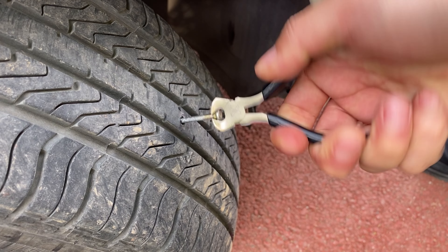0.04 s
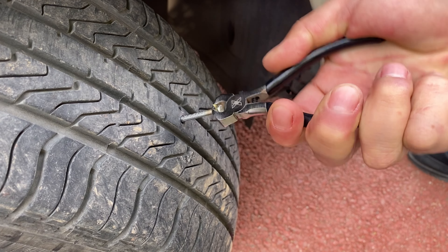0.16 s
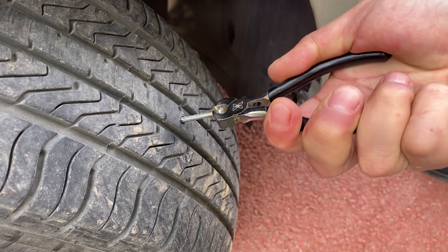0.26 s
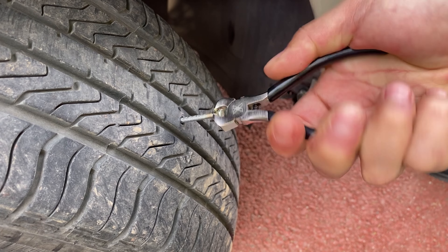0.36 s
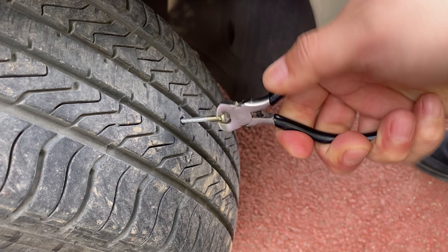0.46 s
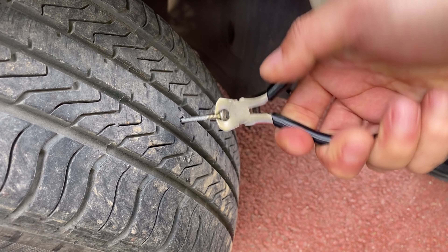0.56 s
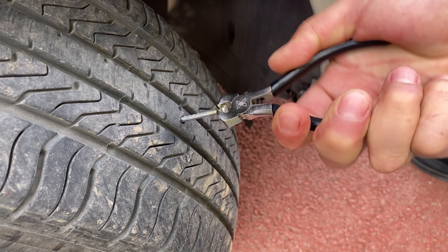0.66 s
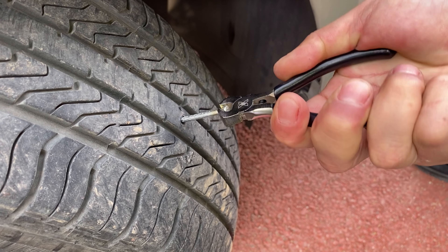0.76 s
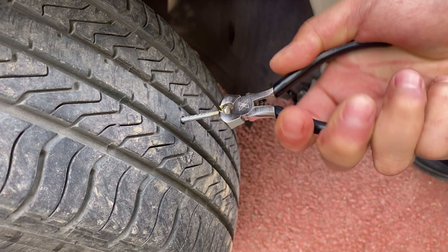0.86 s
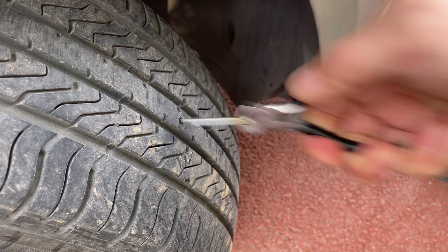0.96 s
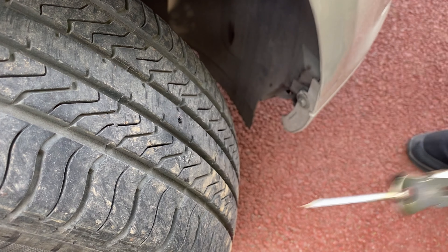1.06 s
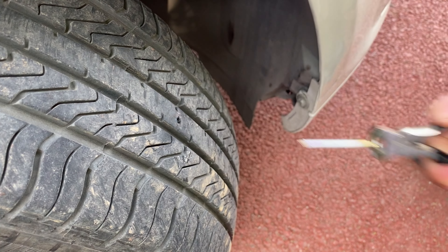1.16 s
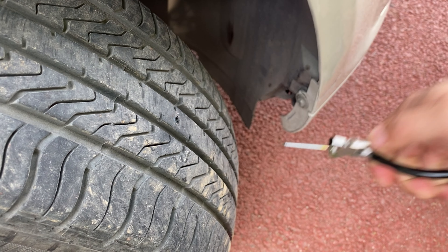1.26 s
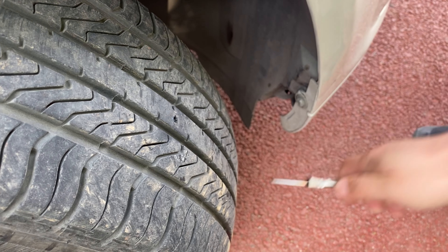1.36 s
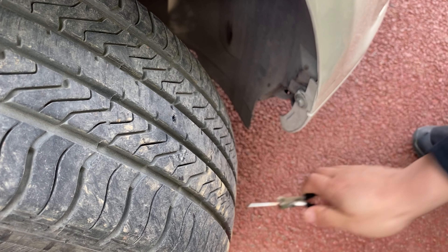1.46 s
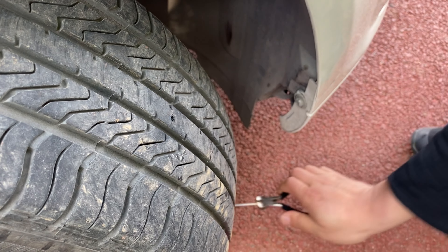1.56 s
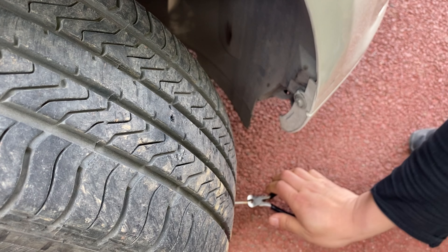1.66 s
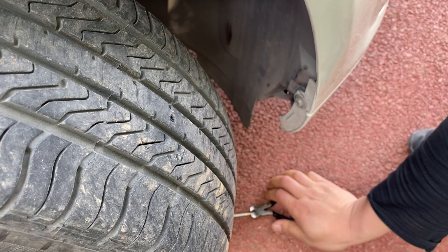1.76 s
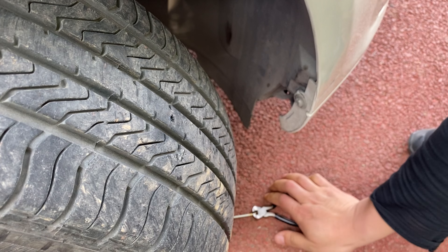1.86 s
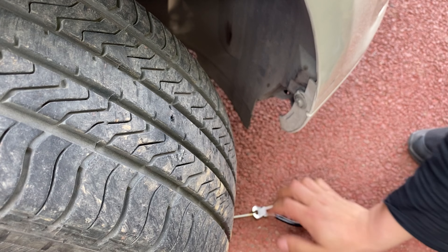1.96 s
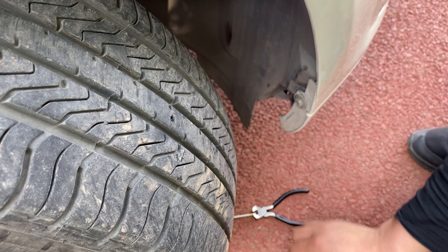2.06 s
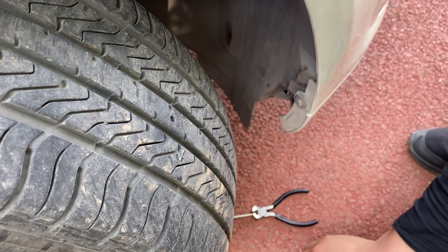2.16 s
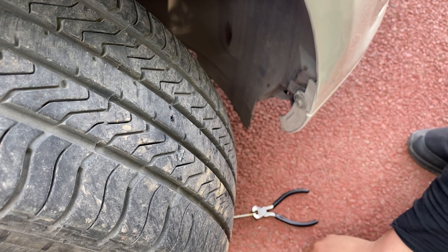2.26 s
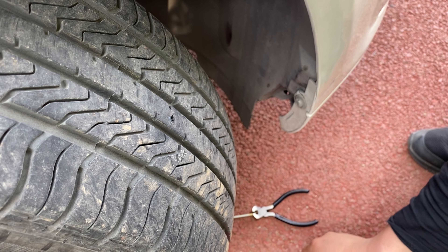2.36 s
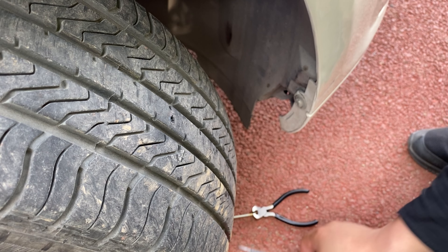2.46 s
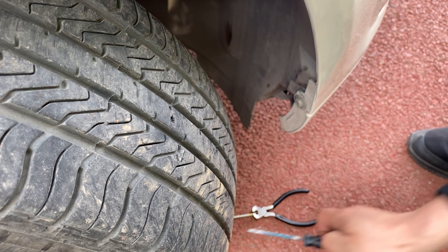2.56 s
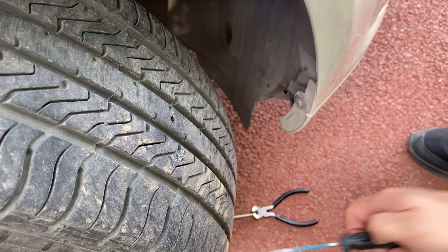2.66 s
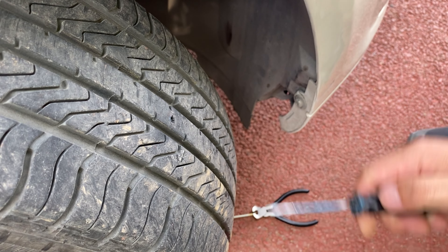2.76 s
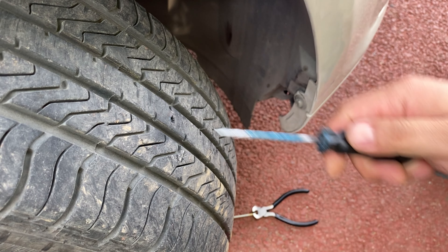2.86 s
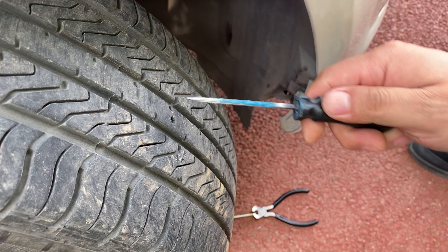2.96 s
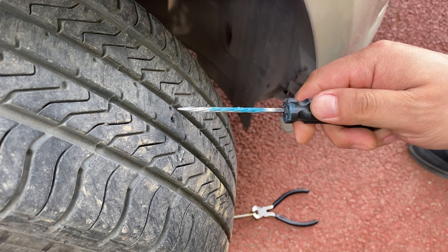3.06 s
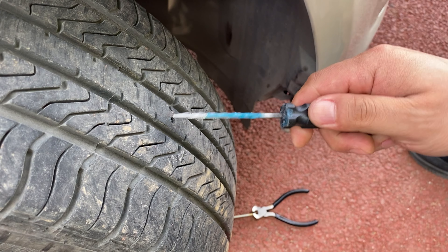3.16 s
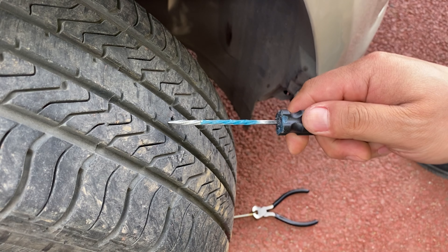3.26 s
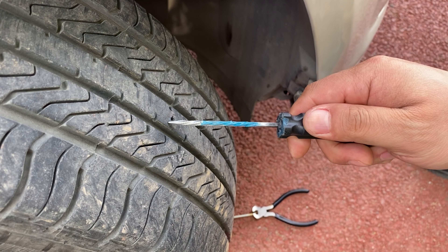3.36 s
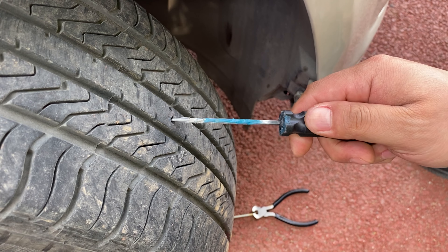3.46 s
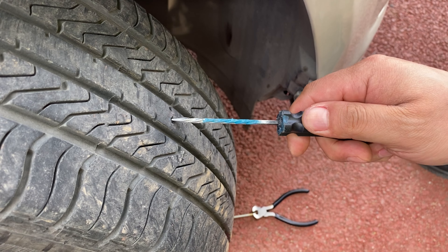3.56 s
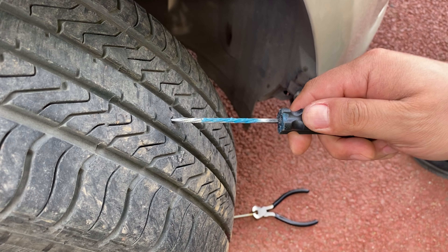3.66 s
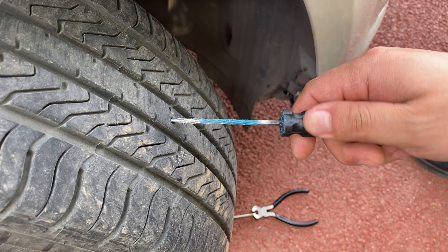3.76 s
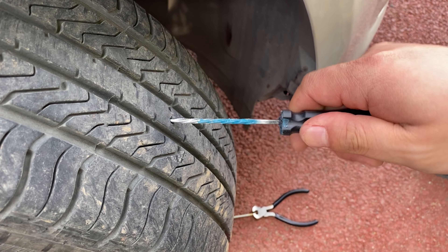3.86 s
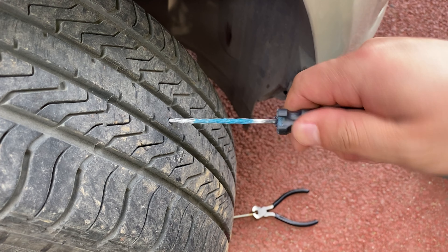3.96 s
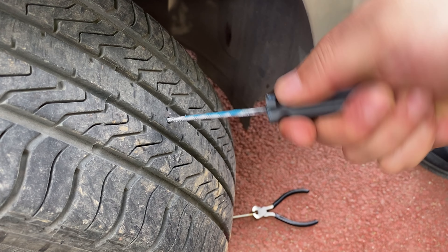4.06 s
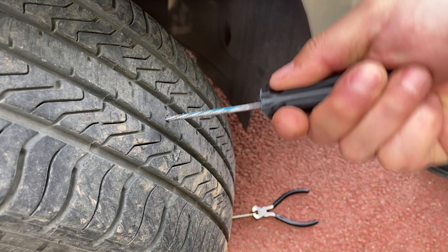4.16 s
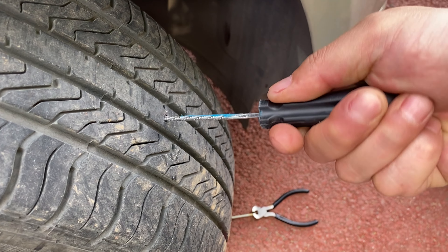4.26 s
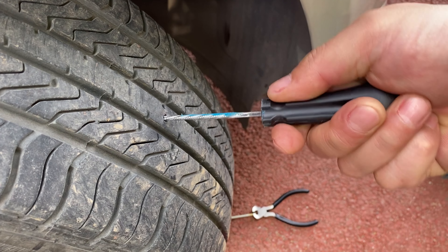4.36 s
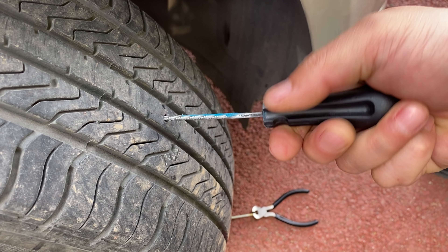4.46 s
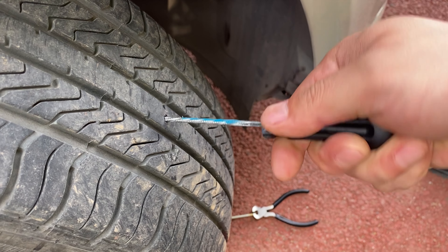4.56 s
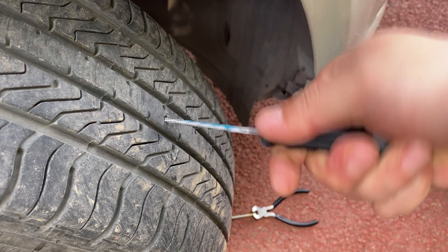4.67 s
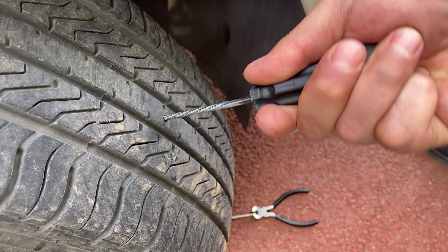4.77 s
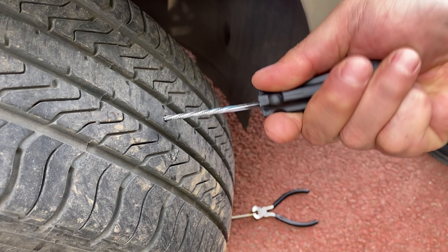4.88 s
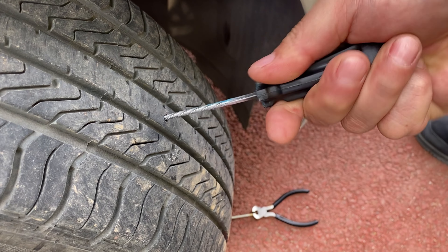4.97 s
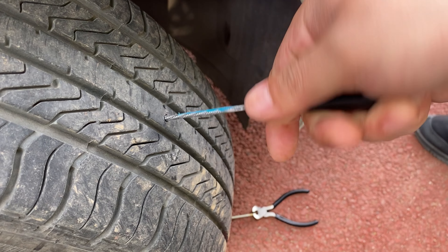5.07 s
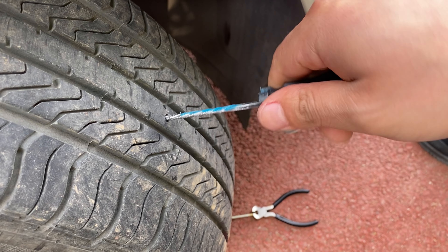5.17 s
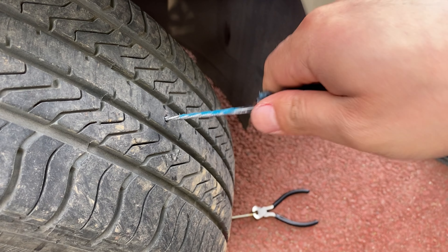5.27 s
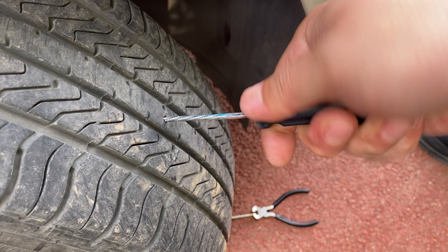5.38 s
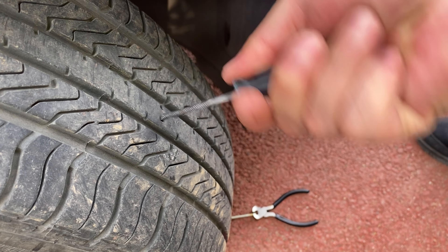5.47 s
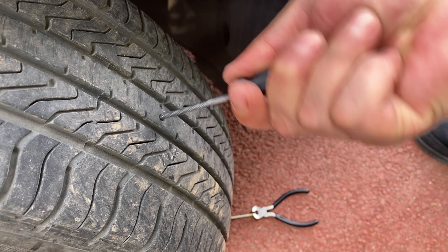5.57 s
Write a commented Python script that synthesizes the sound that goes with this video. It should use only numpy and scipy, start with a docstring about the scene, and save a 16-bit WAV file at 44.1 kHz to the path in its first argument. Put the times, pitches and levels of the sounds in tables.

```python
"""Nail pulled from a tyre

A nail is worked out of a car tyre with pliers: seeping noise, rasps of stick-slip, cracks and ringing steel.
It leaves with a broadband pop and a wall thud, then air jets from the hole as hiss and rush noise.
A reamer crosses the jet, turns a puff of it onto the microphone and plugs the hole; it rubs and rasps
as it is twisted, and a thin leak seeps round the shaft. Low noise gives the light wind and four dull swells,
wavering sines a far machine and a brief whine."""
import sys
import numpy as np
from scipy import signal
from scipy.fft import rfft, irfft, next_fast_len
from scipy.io import wavfile
from scipy.ndimage import uniform_filter1d

SR = 44100
rng = np.random.default_rng(int(sys.argv[2]) if len(sys.argv) > 2 else 0)


def store_wav(level_fs):
    """Save 16-bit WAV to argv[1]."""
    pcm = np.round(np.clip(np.atleast_2d(level_fs), -1, 1) * 32767)
    wavfile.write(sys.argv[1], SR, pcm.T.astype(np.int16))


N = 247842
TIME = np.arange(N) / SR
SIZE = next_fast_len(N + 8192)
FREQS = np.maximum(np.arange(SIZE // 2 + 1) * SR / SIZE, 1)
CUTOFF_HZ = 15750
POP_RISE_DB_PER_S = 5000  # onset of pop and jet

# Colour tables throughout: freq_hz, relative density_db_per_hz
# Hollows of tread and wheel arch, rung by pop and rush: freq_hz, width_hz, full lift_db
HOLLOWS = [(580, 100, 0.5), (1087, 48, 5), (1386, 89, 7), (1960, 90, 7), (2320, 110, 4), (2830, 120, 7),
           (3570, 130, 6), (4360, 110, 5), (4800, 70, 4), (5020, 60, 4), (6050, 90, 8), (6470, 80, 8),
           (7030, 120, 8)]
# Low noise of the puffs and the dull swells
LOW_COLOUR = [(25, -1.5), (60, 3), (150, 9), (300, -1.5), (450, -16), (650, -28), (1500, -52)]


def from_db(db):
    """Decibels to gain."""
    return 10 ** (np.asarray(db) / 20)


def rms_one(x):
    """Scale to unit power."""
    return x / np.sqrt(np.mean(x ** 2) + 1e-20)


def level(rows):
    """Gain over time from a dB curve, near-silent outside it."""
    time_s, level_db = np.transpose(rows)
    return from_db(np.interp(TIME, time_s, level_db, left=-140, right=-140))


def over_hz(points):
    """A table read at every frequency, on a log axis."""
    freq_hz, value = np.transpose(points)
    return np.interp(np.log(FREQS), np.log(freq_hz), value)


def drift(rate_hz):
    """Smooth random wander of rms 1, its spectrum halved in amplitude at rate_hz."""
    smoothed = rfft(rng.standard_normal(SIZE)) / (1 + (FREQS / rate_hz) ** 2)
    return rms_one(irfft(smoothed, SIZE)[:N])


def turbulence(colour, resonances=()):
    """Coloured noise of rms 1, lifted at any resonances, partly shared by the two microphones."""
    # Likeness of the microphones: freq_hz, correlation 0-1
    likeness = [(60, 0.92), (150, 0.81), (300, 0.42), (750, 0.13), (1400, 0.27), (2200, 0.72), (3000, 0.72),
                (4000, 0.43), (6300, 0.86), (8000, 0.72), (8700, 1), (9500, 1), (10200, 0.57), (14200, 1),
                (15200, 0.89)]
    mid, side = rfft(rng.standard_normal((2, SIZE)))
    alike = np.clip(over_hz(likeness), 0, 1)
    pair = np.sqrt(1 + alike) * mid + np.sqrt(1 - alike) * side * [[1], [-1]]
    db = over_hz(colour)
    for hz, width_hz, lift_db in resonances:
        db = db + lift_db / (1 + (2 * (FREQS - hz) / width_hz) ** 2)
    return rms_one(irfft(pair * from_db(db) * (FREQS < CUTOFF_HZ), SIZE)[:, :N])


def bell(centre_s, sigma_s):
    """A Gaussian swell centred on a moment."""
    return np.exp(-np.minimum(((TIME - centre_s) / sigma_s) ** 2 / 2, 50))


def burst(start_s, hold_s, rise_db_per_s, fall_db_per_s):
    """Gain that rises to full at start_s, holds, then dies away."""
    before_s = np.maximum(start_s - TIME, 0)
    after_s = np.maximum(TIME - start_s - hold_s, 0)
    below_db = rise_db_per_s * before_s + fall_db_per_s * after_s
    return from_db(-np.minimum(below_db, 200))


def lean(left_db):
    """Gains of the two microphones for a sound off to one side."""
    return from_db(left_db * np.array([[1], [-1]]) / 2)


def wind(gust_db):
    """Low rumble of moving air, its strength following the breeze, its lull and its gusts."""
    wind_colour = [(18, -51.5), (30, -25.5), (45, -3), (60, 3.5), (80, -2), (110, -4), (150, -14),
                   (220, -23.5), (350, -32.5), (800, -52), (2000, -71.5)]
    # Gusts that stand out of the breeze: centre_s, level_db before gust_db, sigma_s
    gust_rows = [(.25, -45.5, 0.11), (0.717, -35, 0.023), (0.845, -47, 0.024), (1.04, -34, 0.017),
                 (1.32, -49, 0.03), (1.807, -38, 0.029), (2.306, -43.5, 0.038), (2.48, -40.5, 0.03),
                 (3.364, -51.5, 0.065), (3.663, -50, 0.032), (4.0, -34, 0.038), (4.089, -40, 0.015)]
    # The breeze dies down for a moment: start_s, end_s, depth_db, fade_s
    lull = (4.27, 4.9, 17.3, 0.17)
    breeze_start_db, ease_db_per_s = -42, 1.5

    rumble = turbulence(wind_colour)
    power = np.mean(rumble ** 2, axis=0)
    rumble = rumble / np.sqrt(uniform_filter1d(power, size=4400))  # even out over 0.1 s
    start_s, end_s, depth_db, fade_s = lull
    calm = np.clip(np.minimum(TIME - start_s, end_s - TIME) / fade_s, 0, 1)
    breeze = from_db(breeze_start_db - ease_db_per_s * TIME - depth_db * calm)
    gusts = sum(from_db(db) * bell(centre_s, sigma_s) for centre_s, db, sigma_s in gust_rows)
    return (breeze + from_db(gust_db) * gusts) * rumble


def far_tone(hz, waver, broken_db):
    """A distant tone that wavers in pitch and fades in and out on the breeze."""
    cycles = hz * np.cumsum(1 + waver * drift(20)) / SR
    return from_db(broken_db * drift(12)) * np.sin(2 * np.pi * cycles)


def outdoors(drone_waver, drone_broken_db, whine_waver, whine_broken_db):
    """A soft noise wash of open air, with a far drone and a brief, broken whine of sine partials."""
    # Open air: time_s, level_db
    wash_level = [(0, -52.5), (0.9, -50.5), (3.6, -57), (4.3, -59), (5.62, -55.5)]
    outdoor_colour = [(25, -12), (50, 6), (150, 2.5), (300, -2.5), (500, -9), (950, -12), (1300, -16),
                      (2000, -26), (3000, -29), (5000, -37.5), (15000, -44)]
    # Far machine: pitch_hz, level_db before fading, left_minus_right_db
    drone_rows = [(286.5, -72, 0), (485, -80, -2), (592, -82, -2), (732, -77, 8), (1020, -84, 4),
                  (1084, -85, 2)]
    # Faint whine once the hole is plugged: pitch_hz, level_db before fading
    whine_rows = [(1122, -80), (1688, -77), (2245, -88)]

    drone = sum(from_db(db) * lean(left_db) * far_tone(hz, drone_waver, drone_broken_db)
                for hz, db, left_db in drone_rows)
    whine = sum(from_db(db) * far_tone(hz, whine_waver, whine_broken_db) for hz, db in whine_rows)
    return level(wash_level) * turbulence(outdoor_colour) + drone + bell(4.3, 0.18) * whine


def seep(nail_db, reamer_db, fizz_db, spit_db):
    """A thin leak between steel and rubber; it fizzes finely and spits as the gap shifts."""
    # Past the nail: time_s, level_db before nail_db
    past_nail = [(0.0, -84), (0.1, -80), (0.24, -92), (0.34, -94), (0.39, -78), (0.57, -73.5), (0.92, -82)]
    # Round the reamer shaft: time_s, level_db before reamer_db
    past_shaft = [(4.55, -95), (4.64, -71.5), (4.786, -58.5), (4.98, -60.5), (5.02, -66.5), (5.2, -67),
                  (5.35, -69.5), (5.478, -72.5), (5.496, -66.5), (5.57, -76.5), (5.585, -73), (5.62, -84)]
    # Spurts at the first twists of the reamer: start_s, hold_s, level_db before reamer_db
    spurt_rows = [(4.391, 0.037, -66), (4.468, 0.027, -74), (4.569, 0.021, -66.5)]
    seep_colour = [(600, -11), (1500, -9.5), (2500, -5), (4000, -4), (5500, -5.5), (7000, 0), (10000, -2),
                   (13000, -1.5), (15500, -1)]

    spurts = sum(from_db(db) * burst(start_s, hold_s, rise_db_per_s=750, fall_db_per_s=700)
                 for start_s, hold_s, db in spurt_rows)
    gap = from_db(nail_db) * level(past_nail) + from_db(reamer_db) * (level(past_shaft) + spurts)
    ragged = from_db(fizz_db * drift(600) + spit_db * drift(80))
    return gap * turbulence(seep_colour) * ragged


def rasps(slips_per_s, slip_s, scratch_db, wobble):
    """Dense slips of rubber on steel merge into a rustle, with a breathy squeak at that grip's pitch."""
    # Stick-slip: centre_s, level_db, sigma_s, squeak_hz, squeak_db against level_db
    rasp_rows = [(0.065, -76, 0.044, 3850, 0), (0.287, -80, 0.05, 3500, 0), (0.592, -73, 0.023, 3000, -6),
                 (0.809, -69, 0.04, 3700, -6), (4.438, -70, 0.0085, 3650, 0), (4.45, -72, 0.01, 2500, 1),
                 (4.48, -72, 0.01, 2630, 0), (4.483, -75, 0.01, 3950, 0), (4.583, -75, 0.008, 2800, 1),
                 (4.606, -64, 0.0043, 4650, -2), (5.03, -71, .012, 3400, -3),
                 (5.124, -64, 0.035, 2600, -10), (5.198, -69, 0.02, 3650, 0),
                 (5.385, -68.5, 0.035, 4500, -8), (5.411, -69, 0.011, 3450, -1),
                 (5.503, -67.5, 0.023, 2600, -3)]
    rasp_colour = [(1500, -14), (2200, -1), (2650, -2), (3100, -3), (3600, 0.5), (4600, -6.5), (8000, -20)]

    slips = (rng.random(N) < slips_per_s / SR) * rng.uniform(.3, 1, N)
    slip_decay = np.exp(-1 / (slip_s * SR))
    grain = rms_one(signal.lfilter([1], [1, -slip_decay], slips + 1e-18))
    scratch = from_db(scratch_db) * turbulence(rasp_colour)
    turning = 2 * np.pi * np.cumsum(1 + wobble * drift(396)) / SR  # phase per Hz of pitch
    out = 0
    for centre_s, db, sigma_s, hz, squeak_db in rasp_rows:
        squeak = from_db(squeak_db) * np.sin(hz * turning)
        out = out + from_db(db) * bell(centre_s, sigma_s) * (scratch + squeak)
    return grain * out


def ticks(crack_db, crack_s, tail_db, tail_s, ring_db, knock_db, knock_s):
    """Each slip is a sharp crack with a short scatter, a dull rubber knock and a damped ring of steel."""
    # Steel slipping in rubber and jaws: start_s, peak_db before trims, knock_and_ring_db against peak_db
    tick_rows = [(0.446, -46, -14), (0.692, -49, -16), (0.789, -33.5, -22), (0.8633, -47.5, -12),
                 (0.9302, -28, 7), (0.9438, -19.5, 6), (0.967, -40, -4), (0.9785, -44, -4),
                 (0.983, -41, 16), (0.9866, -34, 5), (0.9983, -14, -9), (1.0035, -34, 16.5),
                 (4.4464, -53, -8), (4.4594, -48, -14), (4.606, -54, -6), (4.6817, -49, 4),
                 (4.842, -45, -10), (5.03, -45, -18), (5.128, -46, -9), (5.4356, -44, -14.5),
                 (5.499, -42, -15), (5.511, -47, -7)]
    # Modes of pliers and nail: freq_hz, relative level_db, t60_s
    steel_modes = [(1120, -9, .022), (1370, -5.5, 0.033), (1710, -2, .018), (2680, -9.5, 0.011),
                   (3600, -2, 0.0099), (5900, -12.5, .012), (7450, -8.5, .012)]

    # crack_s, tail_s and knock_s are times to fall 20 dB
    envelope, knock, blows = np.zeros((3, N))
    for start_s, peak_db, low_db in tick_rows:
        started = TIME > start_s
        age_s = np.maximum(TIME - start_s, 0)
        snap = from_db(-20 * np.minimum(age_s / crack_s, 20))
        scatter = from_db(tail_db - 20 * np.minimum(age_s / tail_s, 20))
        envelope += from_db(peak_db) * started * (snap + scatter)
        knock += from_db(peak_db + low_db - 20 * np.minimum(age_s / knock_s, 20)) * started
        blows[int(start_s * SR)] = from_db(peak_db + low_db)
    ring = np.zeros((2, N))
    for hz, mode_db, t60_s in steel_modes:
        r, w = from_db(-60 / (t60_s * SR)), 2 * np.pi * hz / SR  # pole radius and angle
        mode = signal.lfilter([0, np.sin(w)], [1, -2 * r * np.cos(w), r * r], blows + 1e-18)
        ring += from_db(mode_db) * mode
    crack = turbulence([(400, -18), (1500, -4), (4000, -5.0), (8000, -3.5), (15000, -2.0)])
    rubber = turbulence([(300, -14), (1300, 1), (3500, -3), (8000, -14.5), (15000, -22)])
    return from_db(crack_db) * envelope * crack + from_db(knock_db) * knock * rubber + from_db(ring_db) * ring


def dull_swells(swell_db):
    """A dull low rumble swells and fades four times, a little higher than the wind."""
    # Swells: centre_s, level_db before swell_db, sigma_s
    swell_rows = [(0.68, -52.5, 0.13), (1.75, -58, 0.12), (5.055, -59, 0.1), (5.48, -55, 0.1)]
    strength = sum(from_db(db + swell_db) * bell(centre_s, sigma_s) for centre_s, db, sigma_s in swell_rows)
    return strength * turbulence(LOW_COLOUR)


def pop(pop_db, body_db, body_lag_s, body_rise_db_per_s, body_fall_db_per_s, body_left_db):
    """Air tears past the nail tip in a dense, ragged blast; a hollow body of noise swells just after."""
    pop_colour = [(300, -22), (780, -19), (1200, -14), (2000, -10), (3000, -11), (5500, -5), (8000, 1.5),
                  (12000, 2), (15500, 1)]
    body_colour = [(100, 4.5), (250, 0.5), (500, -2), (780, -5), (1200, -2.5), (2000, -6.5), (3000, -9.5),
                   (6000, -14.5), (12000, -25)]
    pop_s = 1.0178
    ragged = from_db(.5 * drift(400))
    blast = from_db(pop_db) * burst(pop_s, 0.009, POP_RISE_DB_PER_S, fall_db_per_s=750)
    swell = burst(pop_s + body_lag_s, 0, body_rise_db_per_s, body_fall_db_per_s)
    body = from_db(body_db) * lean(body_left_db) * swell
    return (blast * turbulence(pop_colour, HOLLOWS) + body * turbulence(body_colour, HOLLOWS)) * ragged


def thud(db, hz, sigma_s, left_db):
    """The tyre wall springs back as the nail lets go: a short low sine."""
    return from_db(db) * lean(left_db) * bell(1.03, sigma_s) * np.sin(2 * np.pi * hz * TIME)


def flow():
    """Strength of the jet: it sags with tyre pressure, steps and is cut off by the reamer."""
    # Pliers leave the stream, reamer meets the hole, eases back, enters: start_s, length_s, loss_db
    jet_drops = [(1.5, 0.057, 3.5), (3.615, 0.13, 17), (3.79, 0.065, -2), (3.904, 0.099, 19)]
    jet_start_s, plugged_s = 1.04, 4.02
    start_db, sag_db_per_s = -24.5, 1.51
    db = start_db - sag_db_per_s * (TIME - jet_start_s)
    for start_s, length_s, loss_db in jet_drops:
        db = db - loss_db * np.clip((TIME - start_s) / length_s, 0, 1)
    hole_open = burst(jet_start_s, plugged_s - jet_start_s, POP_RISE_DB_PER_S, fall_db_per_s=549)
    return from_db(db) * hole_open


def jet(hiss_db, rush_db, edge_db, flutter_db, sputter_db):
    """Fine eddies hiss at the hole, larger ones rush downstream; the stream half whistles on the reamer."""
    hiss_colour = [(3000, -33), (5500, -25.5), (6600, -15), (7300, -5.5), (9000, -5), (11000, -1.5),
                   (13000, 1.5), (14600, 3), (15600, 0)]
    rush_colour = [(200, -14.5), (450, -14), (900, -13.5), (1500, -10.5), (2200, -8.5), (3000, -4.5),
                   (3900, -5), (5000, -0.5), (6200, 1), (8000, 3.5), (12000, -10.5)]
    edge_colour = [(250, -14.5), (1000, -23), (2500, -16.5), (4200, -12.5), (6000, -8.5), (7800, -2.5),
                   (10000, -5.5), (13000, 0.5), (15600, 1.5)]
    # Breathy edge tones on the reamer: freq_hz, width_hz, lift_db
    edge_tones = [(2930, 360, 4.5), (5250, 160, 5.5), (6070, 213, 10), (7260, 210, 8), (8000, 400, 3.5),
                  (14100, 250, 3)]
    # Reamer crosses the stream: centre_s, sigma_s
    crossing = (3.212, 0.025)

    rush_hollows = [(hz, width_hz, 0.48 * lift_db) for hz, width_hz, lift_db in HOLLOWS]  # rings fainter
    hiss = from_db(hiss_db) * turbulence(hiss_colour)
    rush = from_db(rush_db) * turbulence(rush_colour, rush_hollows)
    edge = from_db(edge_db) * bell(*crossing) * turbulence(edge_colour, edge_tones)
    unsteady = from_db(flutter_db * drift(25) + sputter_db * drift(500))
    return flow() * (hiss + rush + edge) * unsteady


def puffs(puff_db, eddy_db):
    """Eddies on the microphone swing its pressure, quickening then slowing, and shed smaller eddies."""
    # Puffs of air: centre_s, peak_db before trims, pitch_hz at centre
    puff_rows = [(1.789, -32, 111), (3.912, -37, 190), (3.935, -25.5, 56), (3.968, -27.5, 230),
                 (3.978, -31, 333), (3.982, -17.5, 170), (4.017, -22, 70), (4.025, -28.5, 180),
                 (4.054, -33.5, 175), (4.078, -25, 74.6)]
    sigma_cycles, slowing, arch = .9, .25, .2  # arch: swings quicken towards the middle
    out, stir = np.zeros(N), np.zeros(N)
    for centre_s, db, hz in puff_rows:
        sigma_s = sigma_cycles / hz
        push = from_db(db) * bell(centre_s, sigma_s)
        age = np.clip((TIME - centre_s) / sigma_s, -np.pi, np.pi)
        cycles = np.cumsum(hz * np.exp(-slowing * age - arch * age ** 2)) / SR
        # pressure peaks as the eddy lands
        out += push * np.cos(2 * np.pi * (cycles - cycles[int(centre_s * SR)]))
        stir += push * (hz / 230) ** 2  # quick puffs shed the most
    return from_db(puff_db) * out + from_db(eddy_db) * stir * turbulence(LOW_COLOUR)


def rubs(grain_db):
    """The rough reamer shaft drags over rubber in small grains."""
    # Strokes: centre_s, level_db before graining, sigma_s
    rub_rows = [(3.07, -59.5, 0.042), (4.79, -62, .015), (4.819, -60, 0.02), (5.125, -65, 0.04)]
    rub_colour = [(150, -17), (450, 2), (1000, 0), (1700, -10), (4000, -21), (9000, -33.5)]
    stroke = sum(from_db(db) * bell(centre_s, sigma_s) for centre_s, db, sigma_s in rub_rows)
    return stroke * turbulence(rub_colour) * from_db(grain_db * drift(150))


def wheel_arch(x, echo_db, count=7):
    """Close reflections from tread, ground and bodywork ripple the spectrum."""
    out = x.copy()
    for lag in (rng.uniform(.001, .009, count) * SR).astype(int):
        out[:, lag:] += from_db(echo_db) * x[:, :-lag]
    return out


def scene():
    """The tyre and tools under the wheel arch, with the open air around."""
    low_air = wind(gust_db=-1.0) + puffs(puff_db=-0.5, eddy_db=-12.0)
    swells = dull_swells(swell_db=-1.0)
    outside = outdoors(drone_waver=.006, drone_broken_db=3.0, whine_waver=.01, whine_broken_db=4.5)
    leak = seep(nail_db=1.5, reamer_db=2.0, fizz_db=1.0, spit_db=0.5)
    rubber = rasps(slips_per_s=700, slip_s=0.0023, scratch_db=-2.0, wobble=.028)
    rubber = rubber + thud(db=-31.5, hz=116.4, sigma_s=0.009, left_db=-8) + rubs(grain_db=2.5)
    steel = ticks(crack_db=-6.5, crack_s=0.0015, tail_db=-15, tail_s=0.016,
                  ring_db=-23.5, knock_db=-21, knock_s=.008)
    air = pop(pop_db=-13.5, body_db=-20.0, body_lag_s=0.007, body_rise_db_per_s=1700,
              body_fall_db_per_s=720, body_left_db=-2.5)
    air = air + jet(hiss_db=4.0, rush_db=-5.0, edge_db=11.0, flutter_db=0.46, sputter_db=0.1)
    return wheel_arch(air + leak + rubber + steel, echo_db=-21.5) + low_air + swells + outside


def record(dry):
    """The two microphones differ in level and phase with frequency; deep bass and top are cut."""
    # Level: freq_hz, left_minus_right_db
    balance = [(100, -.3), (380, -2.5), (700, -4), (2300, -0.9), (5300, -2.5), (6800, -2), (7600, 2.5),
               (9000, 0)]
    # Phase: freq_hz, left_lead_rad
    phase_lead = [(100, 0), (550, -.5), (2000, -.1), (5300, -.4), (6800, .1), (7300, 1.55), (8600, 3.08),
                  (9500, 3.2), (12200, 6.28), (15200, 9.4)]
    gains = from_db(np.array([[1], [-1]]) / 2 * over_hz(balance))
    pair = gains * np.exp(1j * over_hz(phase_lead) * np.array([[0], [-1]]))
    low_pass = np.clip((CUTOFF_HZ - FREQS) / 150 + .5, 0, 1)
    heard = irfft(rfft(dry, SIZE) * pair * low_pass, SIZE)[:, :N]
    return signal.sosfilt(signal.butter(2, 26, "high", fs=SR, output="sos"), heard)


dry = scene()
out = record(dry)
store_wav(out)
```